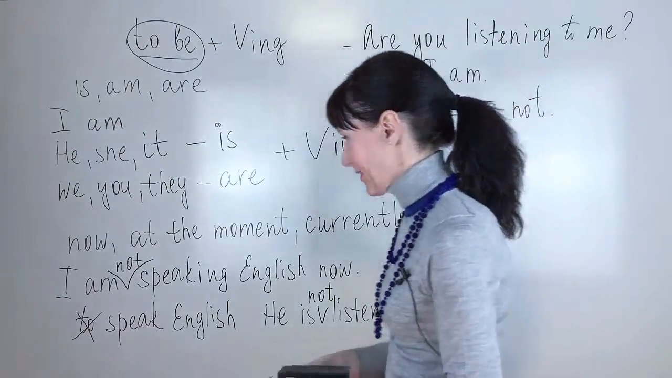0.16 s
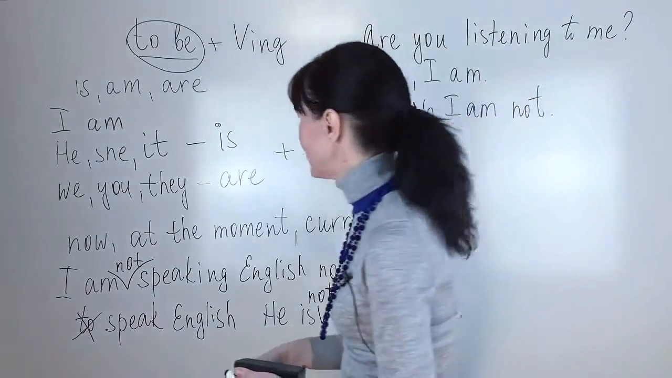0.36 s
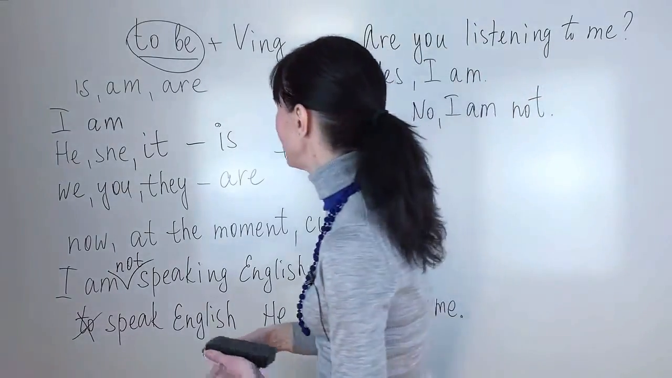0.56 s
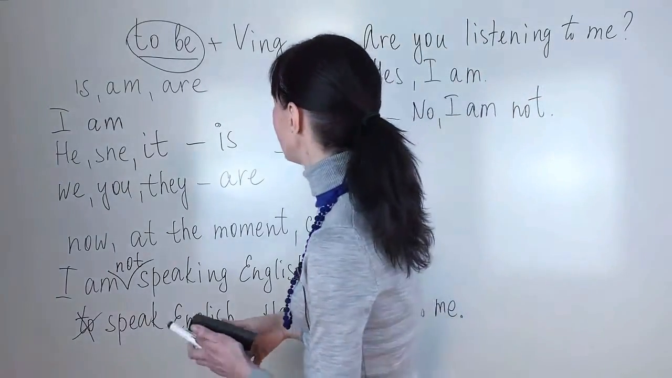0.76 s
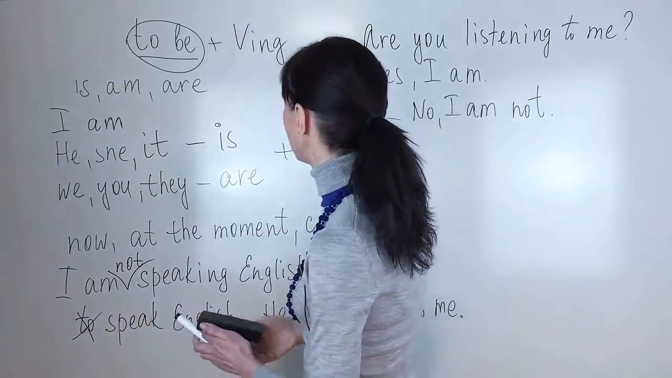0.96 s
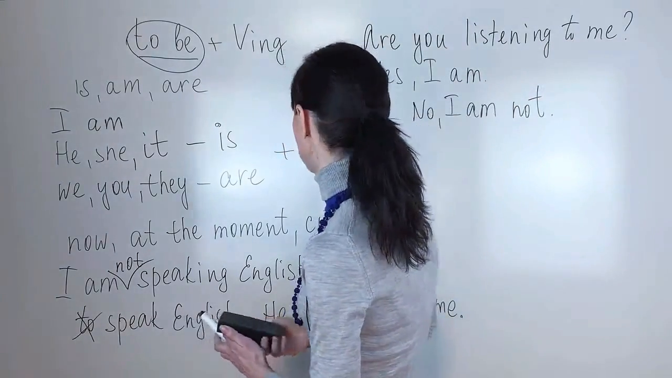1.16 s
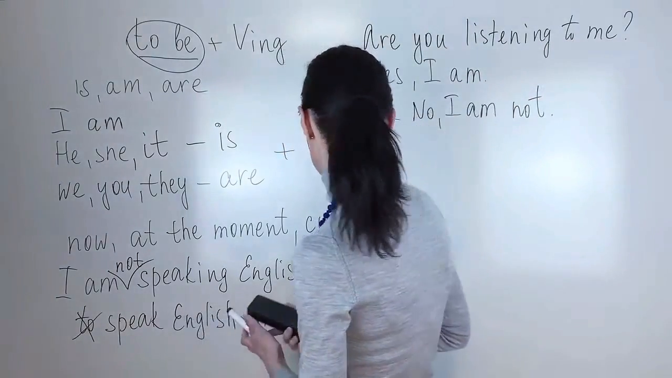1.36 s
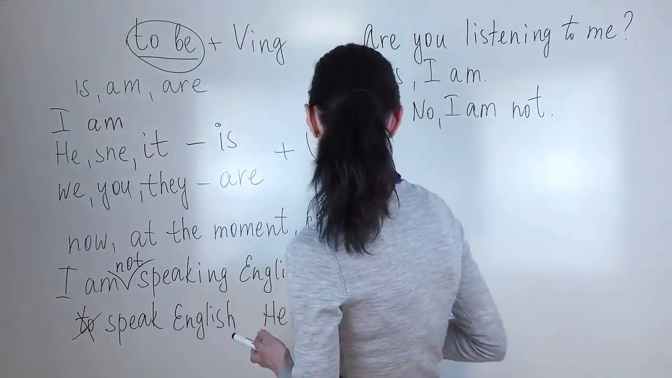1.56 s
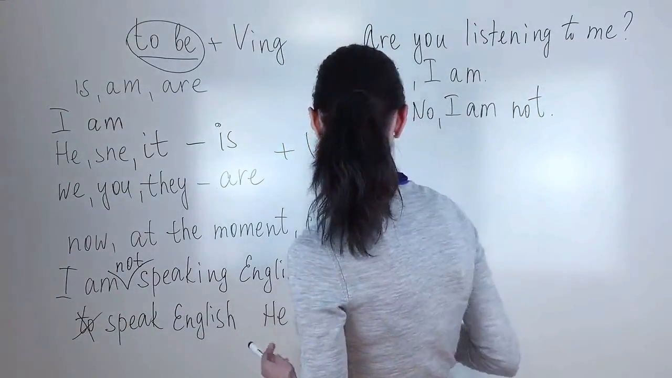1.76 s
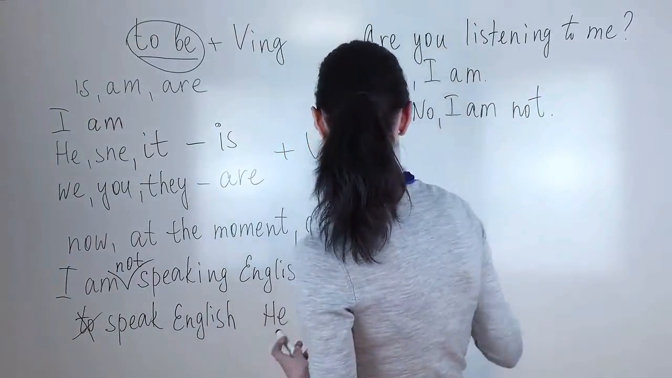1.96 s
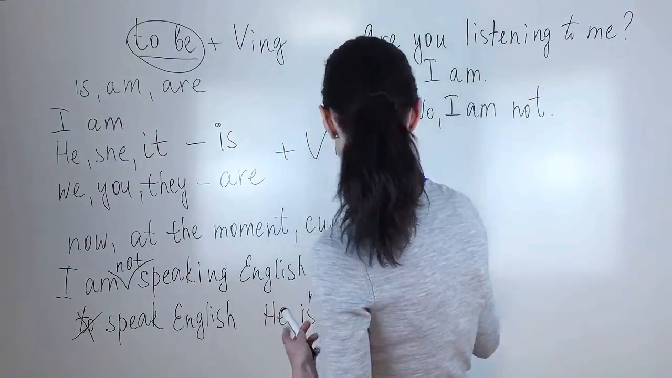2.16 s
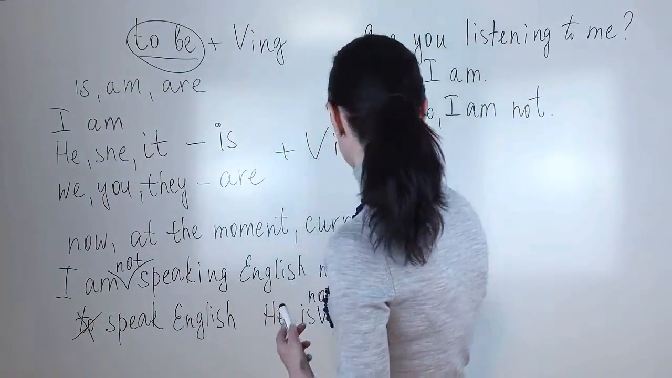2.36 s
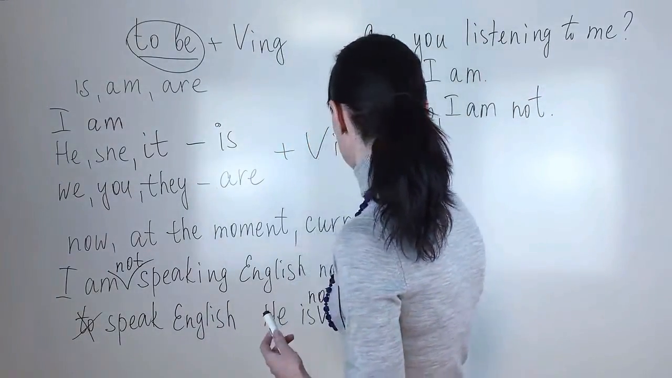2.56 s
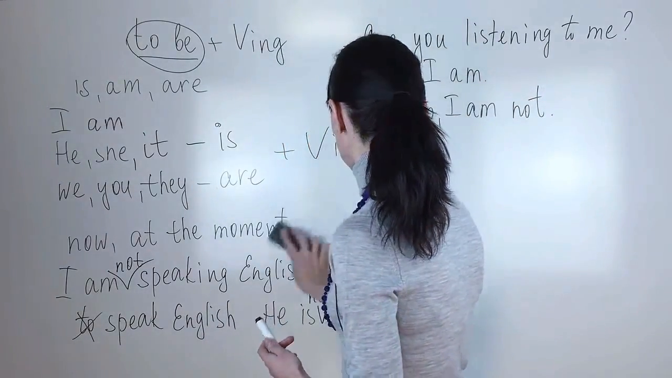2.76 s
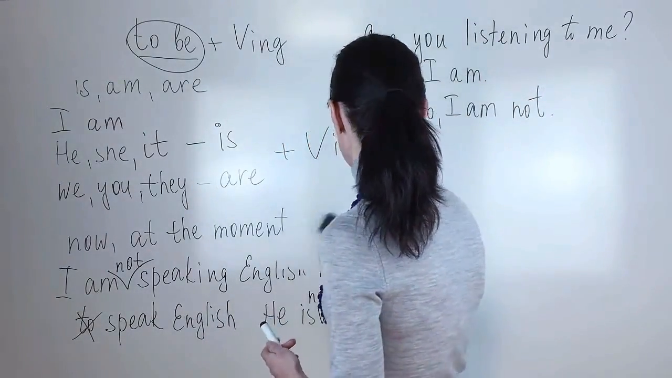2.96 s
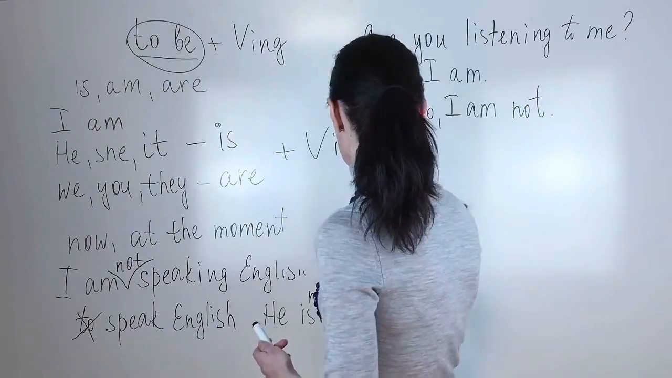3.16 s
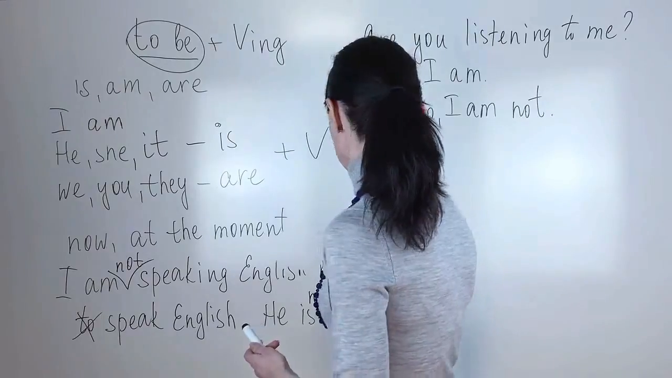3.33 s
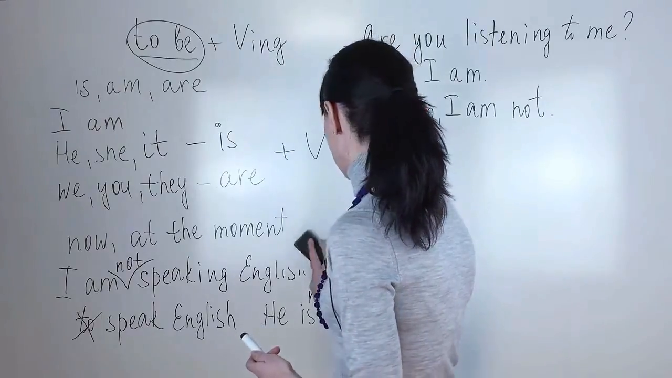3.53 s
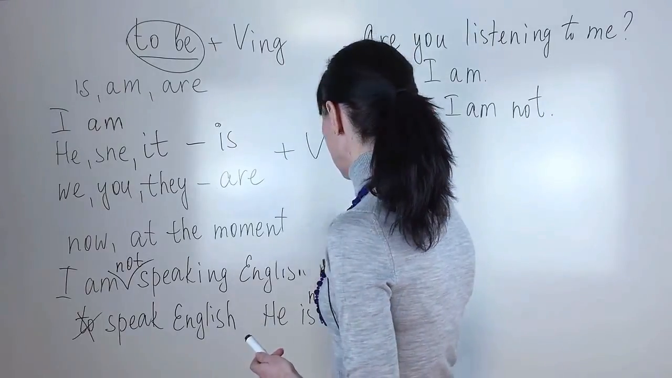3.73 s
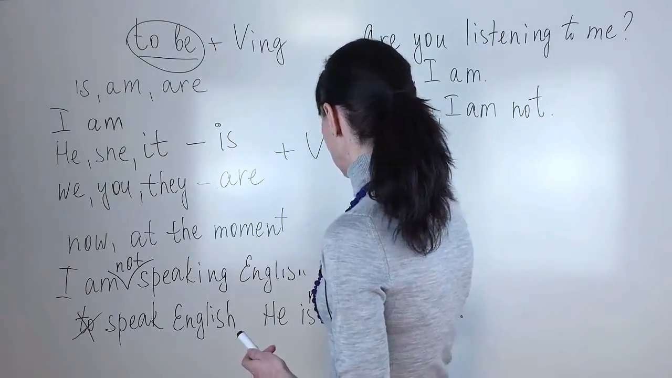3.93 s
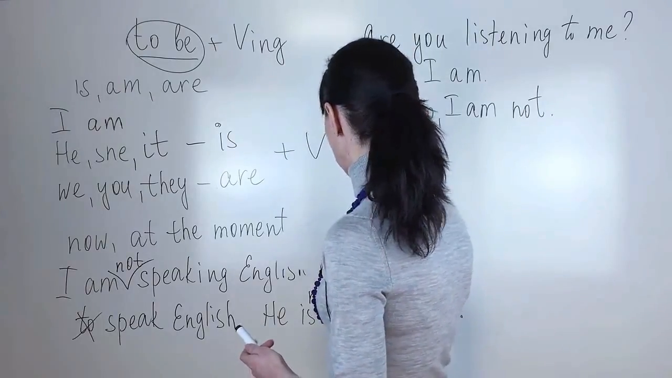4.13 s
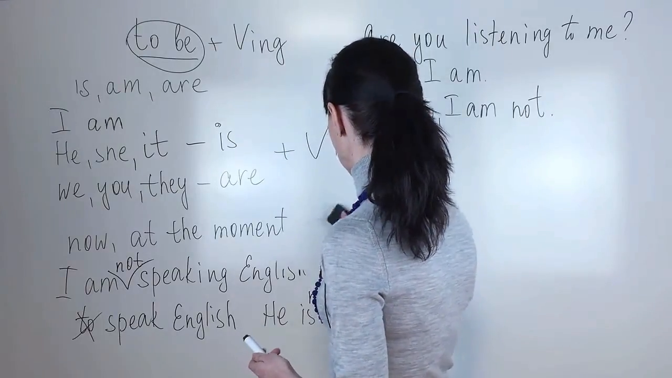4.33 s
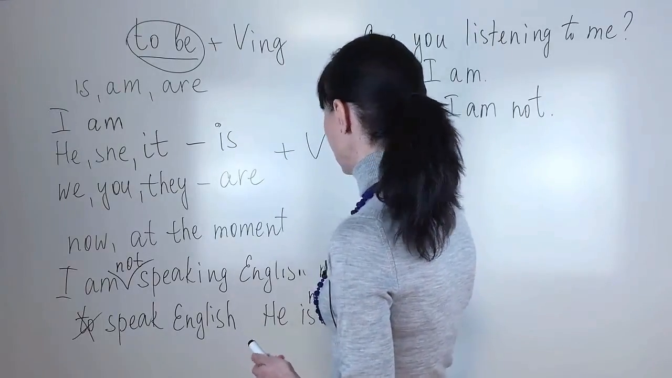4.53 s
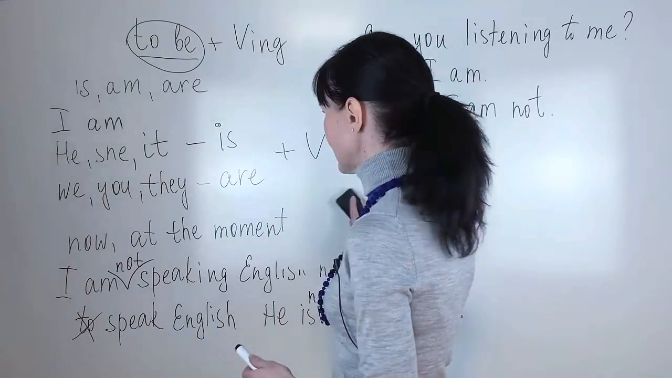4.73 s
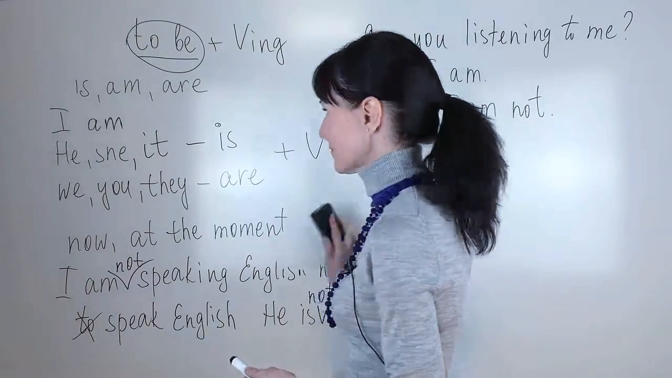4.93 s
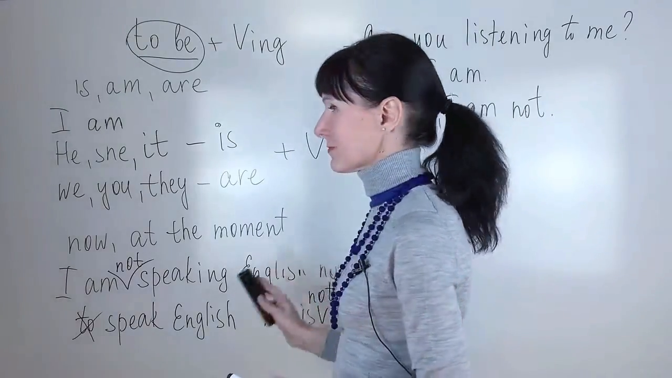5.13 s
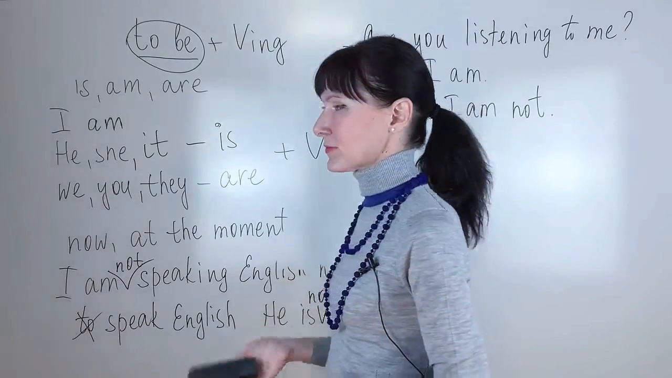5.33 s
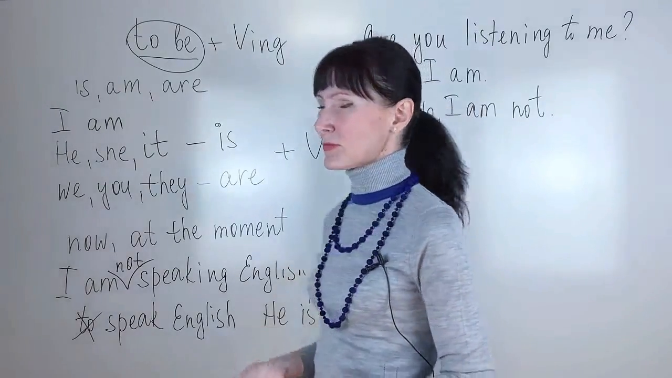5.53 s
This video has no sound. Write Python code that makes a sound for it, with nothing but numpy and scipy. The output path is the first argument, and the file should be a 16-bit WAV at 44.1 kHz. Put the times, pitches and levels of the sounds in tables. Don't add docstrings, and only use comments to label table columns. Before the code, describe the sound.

Two plastic clacks lift an eraser off its tray, then it knocks a hollow whiteboard and wipes it with seven soft, hissing felt strokes.

```python
import sys
import numpy as np
from scipy import signal
from scipy.fft import rfft, irfft, next_fast_len
from scipy.io import wavfile
from scipy.ndimage import uniform_filter1d, map_coordinates

SR = 44100
rng = np.random.default_rng(int(sys.argv[2]) if len(sys.argv) > 2 else 0)


def output_pcm(signal):
    pcm = np.clip(np.atleast_2d(signal).T, -1, 1) * 32767
    wavfile.write(sys.argv[1], SR, np.round(pcm).astype(np.int16))


def invert_db(level):
    return 10 ** (np.asarray(level, dtype=float) / 20)


N = 250840

RUMBLE_HZ = (13, 29.2, 48.6)
# [peak t/s, fade t/s, level/dB]
RUMBLE_SWELLS = [
    [(0, .4, -42.5), (.5, 0.6, -47), (1.1, 0.35, -47.5), (1.7, 0.73, -46.5), (2.3, 0.54, -48),
     (2.95, 0.62, -43.5), (3.55, 0.51, -49), (4.1, 0.49, -49), (4.59, 0.26, -46.5), (5.0, 0.39, -47),
     (5.5, 0.62, -43)],
    [(0, .3, -44.5), (.44, .3, -51), (1.17, 0.51, -47.5), (1.77, 0.23, -44), (2.3, .4, -48),
     (2.63, 0.29, -48), (3.01, 0.29, -45.5), (3.62, 0.52, -47), (4.33, .3, -48), (4.59, 0.25, -42.5),
     (4.95, 0.69, -49.5), (5.69, .4, -53.5)],
    [(.2, 0.52, -49), (.8, .5, -52), (1.25, .4, -52), (1.87, 0.25, -55), (2.34, 0.26, -56),
     (3.03, 0.61, -53.5), (3.5, 0.35, -52), (4.0, 0.52, -50.5), (4.59, 0.44, -53), (4.95, 0.62, -51.5),
     (5.5, 0.73, -51)],
]
# [f/Hz, 60 dB fall t/s]
ECHO_TIMES = [(200, 0.42), (1500, 0.32), (4000, 0.14), (12000, 0.1)]
# [f/Hz, level/dB per Hz]
HISS_COLOUR = [(59, -17.5), (68, -32), (80, -29.5), (129, -34.5), (439, -45), (1100, -49), (4550, -54),
               (15500, -58)]
# [peak t/s, fade t/s, dull rub level/dB, bright rustle and thrum relative level/dB]
MOVES = [(0.0, 0.033, -58.5, -14, 9), (.056, 0.08, -63, -0.5, 5), (.31, 0.16, -70.5, 2, 3),
         (.41, 0.15, -71.5, 8.5, 4), (.556, 0.057, -59.5, -4.5, -16), (.646, 0.045, -56.5, -16, 1),
         (.69, .12, -66.5, 10, -1), (.74, 0.096, -70, 8, 0), (.86, .1, -76, -6, 14),
         (1.02, .1, -71, -5, -1), (1.13, 0.11, -71, 1, -2), (1.25, 0.12, -69.5, 0, -6),
         (1.41, 0.065, -66, -7, 8), (1.515, 0.12, -69, 6, 2), (1.685, .1, -71, -15, 14.5),
         (1.89, .15, -74.5, 5.5, 1), (5.01, 0.037, -71, -8, 7), (5.07, 0.16, -78, 9, 14.5),
         (5.33, .12, -78, -5, 5), (5.47, 0.18, -80, -7, 6), (5.65, .08, -74, -4, -3)]
# [f/Hz, level/dB per Hz]
THRUM_COLOUR = [(50, -37), (95, 5), (180, -0.5), (300, -10.5), (600, -35)]
RUB_COLOUR = [(200, -8), (450, 0.5), (1200, -5.5), (2500, -9.5), (4000, -16.5), (7000, -56)]
RUSTLE_COLOUR = [(1500, -4.5), (4000, -3), (7500, -4), (10000, -9), (14000, -6), (15300, -9), (15500, -30)]
# [peak t/s, fade t/s, level/dB]
BEAD_DRAGS = [
    (1.545, .04, -75),
    (1.615, .05, -70),
    (1.692, .012, -68),
    (1.8, .06, -76),
    (1.845, .04, -74),
]
# [f/Hz, width f/Hz, level/dB]
BEAD_PEAKS = [(10800, 760, 2), (12000, 800, -6)]
# [t/s, peak level/dB, f/Hz,
# cycles]
TICKS = [(0.046, -49, 1900, 3.4), (.056, -51, 12000, 3.7), (.195, -46, 8000, 2),
         (.337, -48, 4300, 2.5), (.374, -52, 900, 2.7), (.4695, -50, 7200, 5), (.47, -43, 2500, 1.5),
         (.462, -55, 10800, 12), (.497, -52, 11000, 10), (.291, -55, 6500, 3), (.291, -56, 2300, 2.8),
         (.3, -58, 2200, 3), (.637, -53, 1020, 4.2), (0.636, -50, 3300, 2.6), (1.222, -60, 2060, 12),
         (1.223, -59, 3700, 14), (1.314, -45, 1500, 0.94), (1.369, -52, 3320, 8),
         (1.369, -59, 6300, 9), (1.405, -53, 413, 2.8), (1.504, -55, 2500, 3.5),
         (1.547, -63, 10500, 9), (1.602, -62, 2980, 11), (1.692, -58, 11100, 9),
         (1.754, -54, 10600, 4), (1.315, -62, 4970, 4.6),
         (4.806, -54, 1100, 2.8), (4.807, -46, 3500, 1.6), (4.996, -61, 2800, 3.7),
              (5.356, -55, 1300, 2.7), (5.377, -45.5, 1310, 1.3), (5.378, -53, 3800, 2),
              (5.387, -51, 2300, 2.4), (5.413, -49, 8800, 8), (5.414, -48, 12000, 5.4),
              (5.661, -53.5, 800, 2.8), (5.663, -51, 1900, 2.5), (5.688, -55, 1500, 1.5),
              (5.674, -54, 1600, 1.8)]
TINKLE_TIMES = [
    1.874,
    5.062,
]
# [f/Hz, 60 dB fall t/s, first blow level/dB, second blow level/dB]
CLASP_MODES = [(2500, 0.27, -76, -71), (3090, 0.16, -75, -67), (4200, 0.38, -66, -63.5),
               (4600, 0.2, -80, -59), (5150, 0.26, -64, -79), (6250, 0.15, -64, -65), (7074, .12, -80, -63),
               (8250, 0.11, -65, -60), (11530, 0.29, -64, -63), (12600, .1, -78, -74)]
# [t/s, peak level/dB, sharp edge relative level/dB]
CLACKS = [
    (0.1488, -21, -20.5),
    (0.1523, -36, -24),
    (0.4865, -27, -7),
    (0.4896, -44, -5),
]
# [f/Hz, width f/Hz, level/dB]
PLASTIC_PEAKS = [(486, 160, -12.5), (1006, 320, -4), (1500, 180, 4.5), (1960, 340, -4), (2300, 690, -11.5)]
RIM_PEAKS = [(3110, 130, 11.5), (3700, 1400, 7.5), (4750, 1200, -1.5), (6000, 270, -8), (7650, 2800, -11),
             (11000, 5000, -18)]
# [t/s, level/dB]
KNOCKS = [
    (2.2008, -23),
    (2.206, -29.5),
    (2.2446, -33),
]
# [f/Hz, level/dB, 60 dB fall t/s]
BOARD_MODES = [(112, -15.5, 0.34), (148.6, -5, 0.087), (181, -14.5, 0.21), (271, -3.5, 0.069),
               (309, -3, 0.093), (405, -4, 0.1), (410, -3, 0.36), (426, -15, .4), (473.3, -22, 0.5),
               (521.5, -6, 0.24), (573, -14, 0.148), (660, -16, 0.25), (747, -25, 0.16), (980, -23, 0.088)]
# [f/Hz, level/dB per Hz]
SHUDDER_COLOUR = [(70, -29), (150, -20), (420, 3), (700, -7), (1200, -18), (2200, -20), (4000, -35)]
# [start t/s, length t/s, level/dB, gain along the stroke/dB, speed-up t/s]
STROKES = [
    (2.29, 0.58, -56.5, 0, 0.34),
    (2.845, 0.34, -58, 2, 0.059),
    (3.165, 0.41, -56.5, 2.5, 0.1),
    (3.595, 0.396, -59, 1.5, 0.15),
    (3.99, 0.36, -57, 2.5, 0.12),
    (4.305, 0.25, -60.5, 3.5, .1),
    (4.55, 0.27, -59, 0, 0.087),
]
# [f/Hz, width f/Hz, level/dB]
FELT_PEAKS = [(7760, 1770, 2), (6130, 1500, -4.5)]
SHELL_PEAKS = [(3280, 870, -5.5), (5840, 1550, -4.5), (2260, 1800, -19)]
PANEL_PEAKS = [(478, 18, 2.5), (336, 130, -13.5), (565, 37, -7), (800, 340, -10.5), (1210, 500, -14),
               (1900, 1300, -14.5)]
# [f/Hz, level/dB per Hz]
FIBRE_COLOUR = [(1000, -6), (6000, -17), (9500, -2), (14500, 3), (15800, -10.5), (17000, -64)]


def unit(x):
    return x / np.sqrt(np.mean(x ** 2) + 1e-20)


def along(points, hz):
    f, value = np.transpose(points)
    return np.interp(np.log(hz + 1), np.log(f + 1), value)


def wobble(rate):
    knots = rng.standard_normal(int(N * rate / SR) + 4)
    return map_coordinates(knots, [np.arange(N) * rate / SR])


def filtered(x, response):
    m = next_fast_len(N + SR // 2)
    hz = np.fft.rfftfreq(m, 1 / SR)
    return irfft(rfft(x, m) * response(hz), m)[:N]


def resonant(x, peaks):
    def response(f):
        total = 0
        for k, (centre, width, db) in enumerate(peaks):
            damping = 1j * f * width
            total = total + (-1) ** k * invert_db(db) * damping / (centre * centre - f * f + damping)
        return total
    return filtered(x, response)


def patchy(depth_db, wide=6, long=8):
    z = signal.stft(rng.standard_normal(N), nperseg=512)[2]
    field = uniform_filter1d(rng.standard_normal(z.shape), round(wide), 0)
    field = uniform_filter1d(field, round(long), 1)
    return signal.istft(z * invert_db(depth_db * unit(field)), nperseg=512)[1][:N]


def coloured(x, spectrum):
    return unit(filtered(x, lambda hz: invert_db(along(spectrum, hz))))


def ring(modes, attack, rough):
    t = np.arange(SR) / SR
    tone = np.zeros(SR)
    for hz, db, t60 in modes:
        drift = rough * np.cumsum(rng.standard_normal(SR))
        tone += invert_db(db - 60 * t / t60) * np.sin(2 * np.pi * hz * t + drift)
    return tone * (1 - np.exp(-t / attack))


def add(track, sound, s):
    part = track[round(s * SR):][:len(sound)]
    part += sound[:len(part)]


def swells(rows, rise, shape):
    t, power = np.arange(0, N, 32) / SR, 0
    for s, fade, db in rows:
        distance = np.maximum((t - s) / fade, (s - t) / (rise * fade))
        power = power + invert_db(db - 20 * distance ** shape) ** 2
    return np.interp(np.arange(N) / SR, t, np.sqrt(power))


def room(x):
    hz, t, z = signal.stft(rng.standard_normal(SR // 2), SR, nperseg=256)
    decay = invert_db(-60 * t / along(ECHO_TIMES, hz)[:, None])
    tail = signal.istft(z * decay, SR, nperseg=256)[1]
    delayed = np.pad(x, (150, 0))
    return signal.fftconvolve(delayed, tail / np.linalg.norm(tail))[:N]


def rumble():
    x = np.zeros(N)
    for hz, rows in zip(RUMBLE_HZ, RUMBLE_SWELLS):
        phase = 2 * np.pi * np.cumsum(hz + 1.763 * wobble(6)) / SR
        flutter = invert_db(2 + 1.04 * wobble(6.2))
        x += swells(rows, rise=1.0, shape=1.38) * flutter * np.sin(phase)
    return x


def hiss():
    return invert_db(-58) * coloured(patchy(depth_db=0.1), HISS_COLOUR)


def cloth():
    s, fade, db, bright_db, thrum_db = np.transpose(MOVES)
    settle_s, settle_fade_s = 1.5, 1.16
    settling = invert_db(-20 * np.clip(np.arange(N) / SR - settle_s, 0, None) / settle_fade_s)

    def movement(relative_db, fidget_db):
        humps = swells(zip(s, fade, db + relative_db), rise=0.5, shape=1.1)
        return np.hypot(humps, invert_db(fidget_db) * settling)

    thrum = movement(thrum_db, -71) * invert_db(-3.0 + 1.5 * wobble(25))
    thrum *= coloured(rng.standard_normal(N), THRUM_COLOUR)
    rub = movement(0, -69.5) * invert_db(-2.67 + 2.8 * wobble(29.6))
    rub *= coloured(patchy(depth_db=2.0), RUB_COLOUR)
    rustle = movement(bright_db, -81.5) * invert_db(-0.27 + 1.4 * wobble(90))
    rustle *= coloured(patchy(depth_db=2.5), RUSTLE_COLOUR)
    return thrum + rub + rustle


def rasp():
    slips = invert_db(6.5 * wobble(200)) * rng.standard_normal(N)
    beads = resonant(resonant(slips, BEAD_PEAKS), BEAD_PEAKS)
    return swells(BEAD_DRAGS, rise=.7, shape=1.3) * unit(beads)


def ticks():
    x, t = np.zeros(N), np.arange(SR // 20) / SR
    for s, db, hz, cycles in TICKS:
        add(x, invert_db(db + 5.0 - 30 * t * hz / cycles) * np.sin(2 * np.pi * hz * t), s)
    return x


def tinkles():
    x = np.zeros(N)
    for k, s in enumerate(TINKLE_TIMES):
        modes = [(hz, db[k], t60) for hz, t60, *db in CLASP_MODES]
        add(x, ring(modes, attack=.004, rough=.08), s)
    return x


def clacks():
    x = np.zeros(N)
    for pair in (CLACKS[:2], CLACKS[2:]):
        body, rim = np.zeros(N), np.zeros(N)
        for s, db, edge_db in pair:
            add(body, -invert_db(db + 24) * np.ones(1), s)
            add(rim, -invert_db(db + edge_db + 18) * np.ones(1), s)
        dry = resonant(body, PLASTIC_PEAKS[1:]) + resonant(body, PLASTIC_PEAKS[:1])
        dry += resonant(rim, RIM_PEAKS)
        x += dry + invert_db(-11) * room(dry)
    return x


def knock():
    x, t = np.zeros(N), np.arange(SR // 2) / SR
    modes = ring(BOARD_MODES, attack=.0012, rough=.002)
    for s, db in KNOCKS:
        add(x, invert_db(db - 4.5) * modes, s)
    first_s = KNOCKS[0][0]
    shudder = coloured(rng.standard_normal(N), SHUDDER_COLOUR)[:len(t)]
    add(x, invert_db(-43 - 60 * t / .25) * (1 - np.exp(-t / .003)) * shudder, first_s)
    crack = uniform_filter1d(rng.standard_normal(len(t)), size=4)
    add(x, invert_db(-43.5 - 60 * t / 0.013) * crack, first_s)
    return x + invert_db(-14) * room(x)


def stroking(layer=(0, 0, 0, 0), steep=.8, creep_db=-12.5):
    brake_s, creep_s = (0.13, 0.074), 0.13
    t, power = np.arange(0, N, 32) / SR, 0
    for k, (s, length, db, gain_db, start) in enumerate(STROKES):
        way = k % 2
        ramp = np.minimum((t - s) / start, (s + length - t) / brake_s[way])
        speed = np.sin(np.pi / 2 * np.clip(ramp, 0, 1))
        along_db = (gain_db + layer[2 + way]) * ((t - s) / length - .5)
        power = power + (invert_db(db + layer[way] + along_db) * speed ** steep) ** 2
        power = power + invert_db(db + layer[0] + creep_db - 20 * ((t - s) / creep_s) ** 2) ** 2
    return np.interp(np.arange(N) / SR, t, np.sqrt(power))


def shell():
    slips = patchy(depth_db=2.4, wide=2.2, long=22)
    grip_hz, slide_hz = (4800, 4580), (50, 300)
    points = []
    for k, (s, length, *_) in enumerate(STROKES):
        for end in (-1, 1):
            points.append((s + length * (.5 + 0.25 * end), grip_hz[k % 2] + end * slide_hz[k % 2] / 2))
    times, hz = np.transpose(points)
    centre = np.interp(np.arange(N) / SR, times, hz) + 120 * wobble(7)
    sliding = np.zeros(N)
    for f in (4000, 4500, 5000, 5500):
        near = np.clip(1 - abs(centre - f) / 500, 0, 1)
        sliding += near * resonant(slips, [(f, 700, 2.5)])
    return unit(sliding + resonant(slips[::-1], SHELL_PEAKS))


def wiping():
    pad = stroking() * unit(resonant(patchy(depth_db=1.2, wide=3, long=12), FELT_PEAKS))
    body = stroking((-4.5, -3, -3.5, -0.5)) * invert_db(1.5 + 1.4 * wobble(9.9)) * shell()
    fibres = stroking((-1.5, -1.5, -1.5, 1), steep=1.15, creep_db=-19)
    fibres *= invert_db(-0.8 + 0.62 * wobble(8.9)) * coloured(patchy(depth_db=1.5), FIBRE_COLOUR)
    panel = stroking((-16.5, -12.5, 5, -8)) * invert_db(3.3 * wobble(12))
    panel *= unit(resonant(rng.standard_normal(N), PANEL_PEAKS))
    return invert_db(0.21 * wobble(25.18)) * (pad + body + fibres) + panel


def scene():
    faint = hiss() + cloth() + rasp()
    taps = ticks() + tinkles()
    faint += taps + invert_db(-8) * room(taps)
    faint = filtered(faint, lambda hz: hz < 15200)
    x = wiping() + knock() + clacks() + rumble() + faint
    return np.array([x, x])


def low_pass(x):
    return signal.sosfilt(signal.butter(12, 16270, fs=SR, output="sos"), x)


def record(dry):
    x = filtered(dry[0], lambda hz: hz < 15680)
    return low_pass(np.array([x, x]))


dry = scene()
out = record(dry)
output_pcm(out)
```